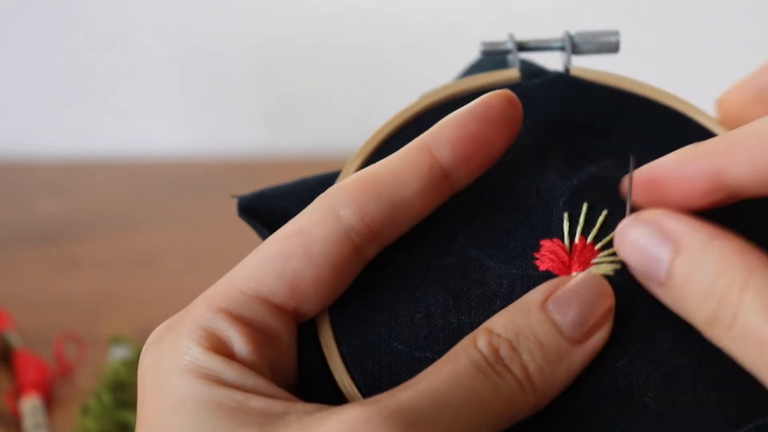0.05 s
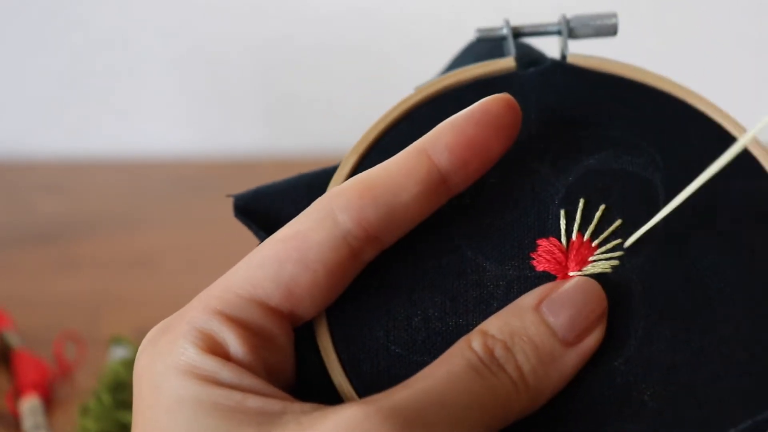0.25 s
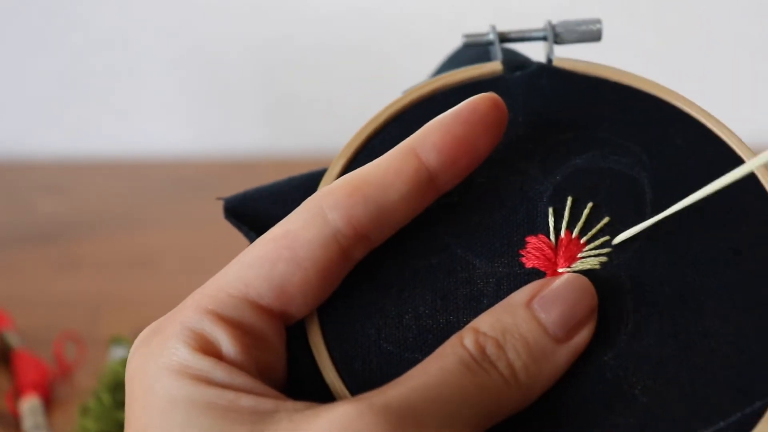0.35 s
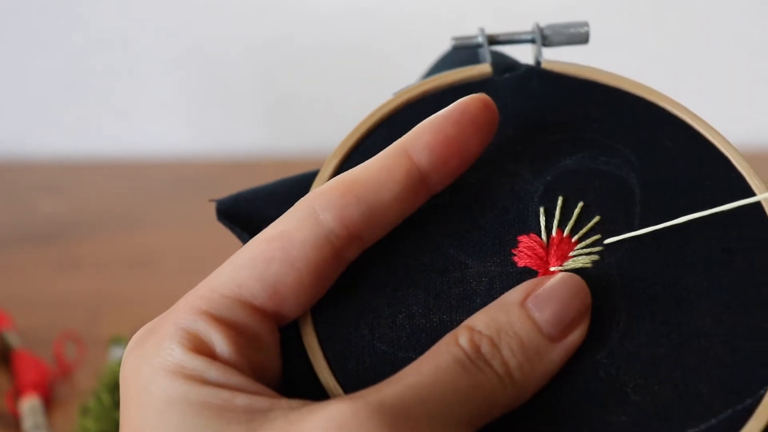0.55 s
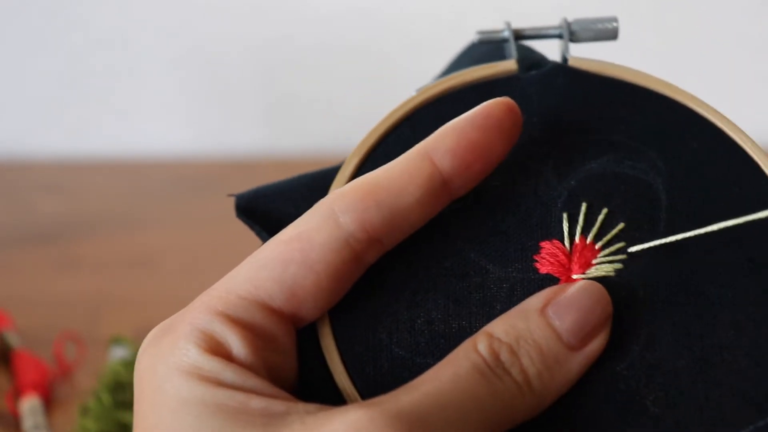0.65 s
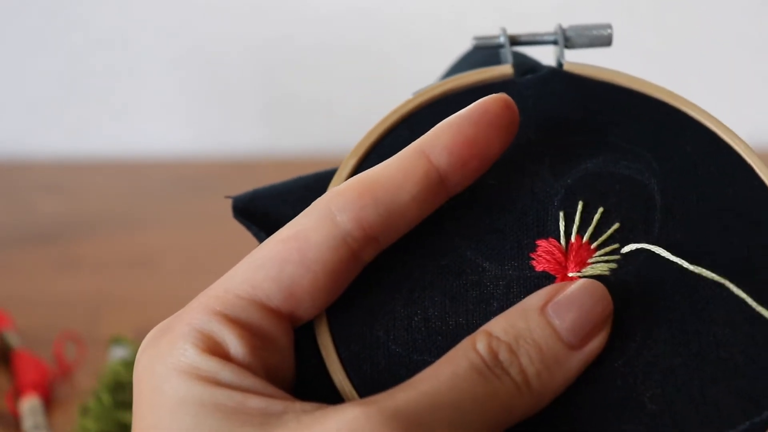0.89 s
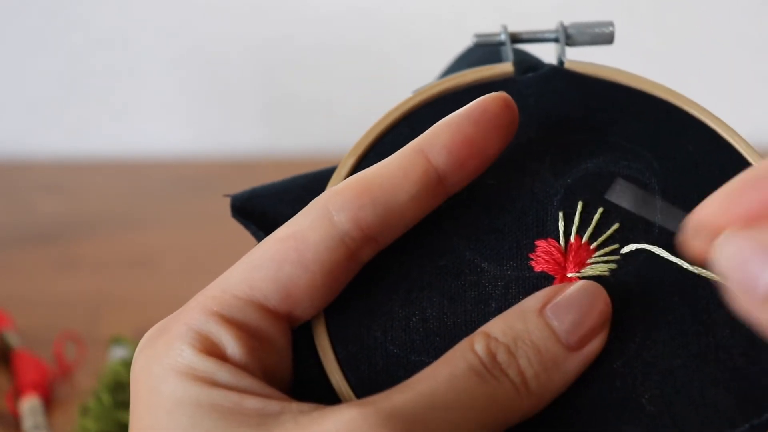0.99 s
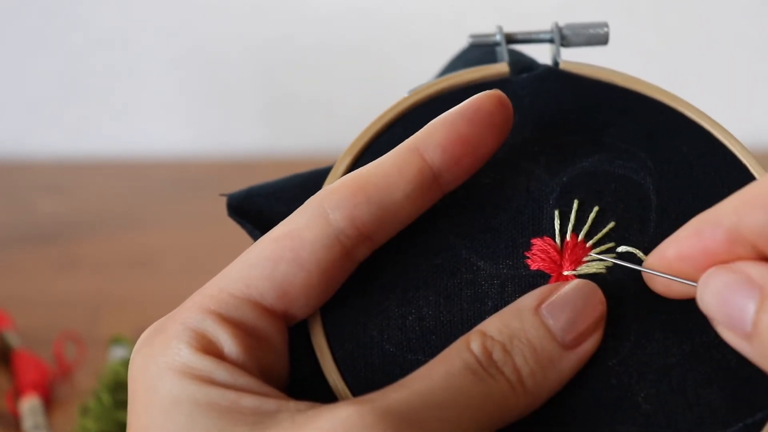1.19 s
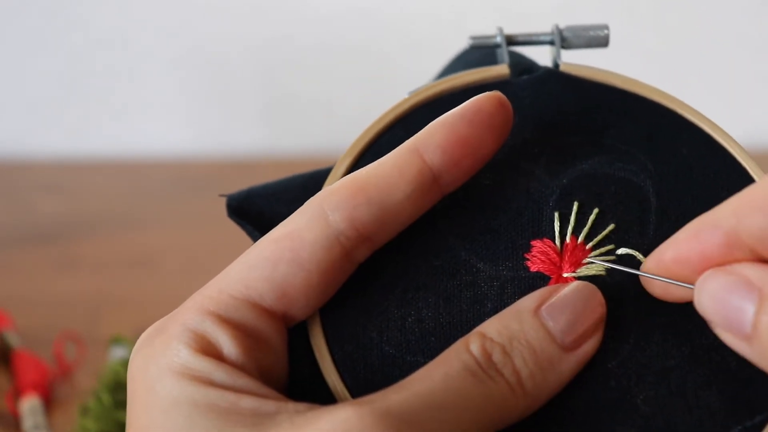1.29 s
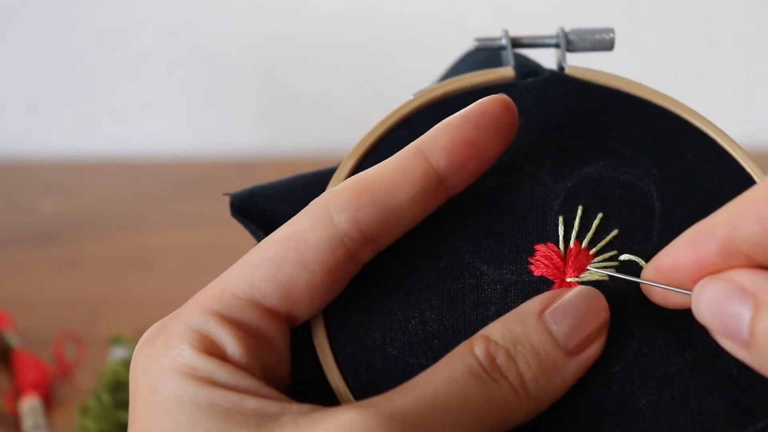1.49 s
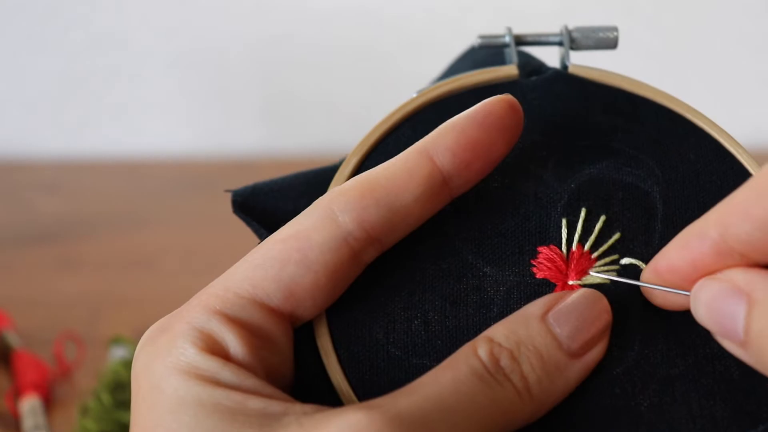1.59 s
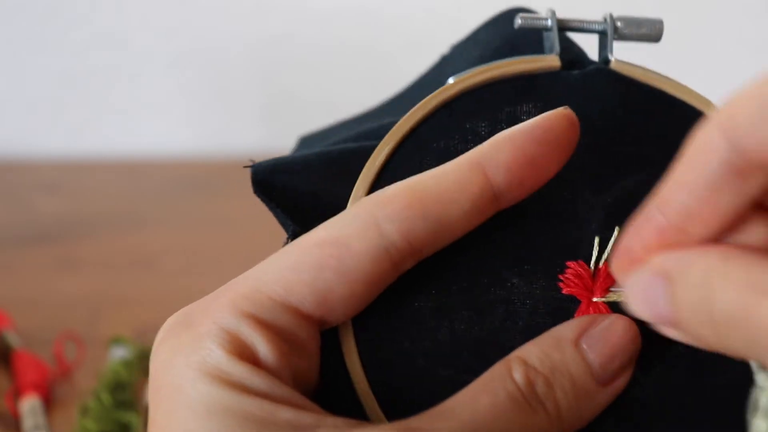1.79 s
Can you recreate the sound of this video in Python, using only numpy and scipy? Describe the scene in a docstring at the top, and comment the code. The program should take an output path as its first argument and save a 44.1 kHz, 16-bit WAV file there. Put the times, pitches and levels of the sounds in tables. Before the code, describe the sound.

One sharp needle pop through drum-tight fabric, followed by the soft rasp of pulled thread.

```python
"""An embroidery needle pops through cloth stretched in a hoop like a small drum: one close stitch.
The shaft squeaks in the weave, the eye clears it with a snap, and the cloth rings in its low modes.
The thread rasps after it and bows faint tones from the cloth until it runs slack.
Later a finger bumps the cloth and the hand rustles back in, over a low room hum and hiss."""
import sys
import numpy as np
from scipy import signal
from scipy.fft import rfft, irfft
from scipy.io import wavfile

SR = 44100
rng = np.random.default_rng(int(sys.argv[2]) if len(sys.argv) > 2 else 0)


def store_pcm(level_fs):
    """Save levels as 16-bit WAV."""
    pcm = np.round(np.clip(level_fs, -1, 1) * 32767).astype(np.int16)
    wavfile.write(sys.argv[1], SR, np.atleast_2d(pcm).T)


N = 81585
T = np.arange(N) / SR
FREQS = np.maximum(np.fft.rfftfreq(N, 1 / SR), 1)


def needle_pop(at_s=.2367, snap_half_width_s=.00032, snap_edge_hz=6100):
    """The eye clears the weave: a snap, a wooden knock, a fibre crack, a steel tick and the cloth's note."""
    cusp = from_db(-9.5) * np.exp(-np.abs(T - at_s) / snap_half_width_s)
    snap = signal.sosfilt(signal.butter(1, snap_edge_hz, fs=SR, output="sos"), cusp + 1e-18)
    knock = from_db(-.5) * signal.lfilter(*signal.iirpeak(2630, Q=1.7, fs=SR), snap)
    crack = noise_burst(at_s, drive_db=-38.5, t60_s=.036, hz=3000, q=.97)
    steel = noise_burst(at_s, drive_db=-37, t60_s=.0012, hz=12000, q=.61)
    drum = from_db(-16) * cloth_ring(at_s)
    return (snap + crack) * panned(-2) + knock * panned(-17.5) + steel * panned(-8) + drum * panned(1)


# Stretched-cloth modes: (frequency [Hz], relative level [dB], T60 [s])
CLOTH_MODES = [(111.4, -6.5, 0.071), (139, -3.5, 0.076), (165, -11, 0.098), (250.4, -11, 0.068),
               (383, -4.5, 0.035), (445, -17.5, 0.11), (610, -60, 0.025), (838, -9.5, 0.014),
               (1020, -16, 0.024)]

def cloth_ring(at_s):
    """The cloth springs back and rings in its damped modes."""
    age_s = np.maximum(T - at_s, 0)
    return -sum(from_db(db - 60 * age_s / t60_s) * np.sin(2 * np.pi * hz * age_s)
                for hz, db, t60_s in CLOTH_MODES)


def hoop_radiation(x, low_cut_hz=85, hollow_hz=1488):
    """The open hoop cancels deep bass and leaves a midrange hollow."""
    x = signal.sosfilt(signal.butter(2, low_cut_hz, "high", fs=SR, output="sos"), x + 1e-18)
    return signal.lfilter(*signal.iirnotch(hollow_hz, Q=1.95, fs=SR), x)


# Thread speed, as rasp level: (time [s], level [dB])
PULL_ENVELOPE = [(.225, -65.5), (.245, -41.5), (.29, -43.5), (.345, -42.5), (.39, -46.5), (.44, -46),
                 (.468, -52.5), (.49, -56.5), (.53, -52.5), (.575, -61), (.66, -83)]
# Rasp colour: (frequency [Hz], relative density [dB])
RASP_SPECTRUM = [(35, -39), (70, -4), (140, 8), (200, -3), (260, 0), (350, -5), (560, 1), (720, -3),
                 (1150, -3.5), (1430, -15.5), (2300, -11), (3000, -11.5), (4200, -18.5), (6500, -20.5),
                 (7500, -22), (10000, -24), (11500, -30.5), (13500, -27), (15500, -39)]
# Thread-driven resonances: (frequency [Hz], width [Hz], boost [dB])
RASP_RESONANCES = [(493, 91, 2.5), (1060, 150, 0.5), (5100, 780, 5.5)]
# Rasp width, also for squeaks: (frequency [Hz], L/R correlation [-])
RASP_CORRELATION = [(60, 0.78), (150, 0.99), (640, 0.96), (1400, 0.77), (3100, 0.66), (6800, -0.13),
                    (15000, -0.43)]
# Balance of rasp, rub and rustle: (frequency [Hz], L-R [dB])
FRICTION_PAN = [(60, -5.5), (300, -0.5), (1200, -1.5), (2400, -4.5), (4000, -2.5), (5200, -5), (8000, -0.5),
                (15000, -11)]

def thread_rasp(slips_per_s=3500, spread_db=2):
    """Tiny fibre slips shake the cloth while the thread runs."""
    sizes = from_db(spread_db * np.minimum(rng.exponential(1, (2, N)), 4))
    slips = np.sign(white_pair()) * sizes * (rng.random((2, N)) < slips_per_s / SR)
    boost_db = sum(db / (1 + (2 * (FREQS - hz) / width_hz) ** 2) for hz, width_hz, db in RASP_RESONANCES)
    rasp = shaped_stereo(slips, over_hz(RASP_SPECTRUM) + boost_db, RASP_CORRELATION, FRICTION_PAN)
    return rasp * envelope(PULL_ENVELOPE)


# Bowed cloth tones: (frequency [Hz], level [dB])
CLOTH_TONES = [(492, -53.5), (1060, -73)]

def cloth_singing(start_s=.202, end_s=.578, ramp_s=.027, fade_db_per_s=13):
    """The thread bows the cloth into faint, unsteady tones that die away with the rasp."""
    attack = np.clip((T - start_s) / ramp_s, 0, 1)
    release = np.exp(-np.maximum(T - end_s, 0) / ramp_s)
    fade_db = fade_db_per_s * (T - start_s)
    out = 0
    for hz, db in CLOTH_TONES:
        phase = wavering_phase(hz, depth=.03, rate_hz=81)
        flutter_db = 2 * drift(25)
        out += from_db(db - fade_db + flutter_db) * np.sin(phase)
    return attack * release * out


# Shaft sticking in the weave: (time [s], level [dB], pitch [Hz])
NEEDLE_SQUEAKS = [(0.026, -53, 1017), (.046, -49, 1140), (0.117, -51, 952)]

def needle_squeaks(rise_s=.0016, t60_s=.066, octave_db=-5.5, rub_db=-5.5):
    """Stick-slip gives short wavering tones with an octave and rubbing noise."""
    rub = shaped_stereo(white_pair(), over_hz(RUSTLE_SPECTRUM), RASP_CORRELATION, FRICTION_PAN)
    out = 0
    for at_s, db, hz in NEEDLE_SQUEAKS:
        age_s = np.maximum(T - at_s, 0)
        gain = np.minimum(age_s / rise_s, 1) * from_db(db - 60 * age_s / t60_s)
        phase = wavering_phase(hz, depth=.038, rate_hz=202)
        tone = np.sin(phase) + from_db(octave_db) * np.sin(2 * phase)
        out += gain * (tone + from_db(rub_db) * rub)
    return out


# Bumps on the cloth: (time [s], gain [dB], contact time [s])
CLOTH_BUMPS = [(.222, -51, 0.00065), (0.253, -34, 0.00037), (.456, -42, .002), (1.057, -41, 0.0011)]

def cloth_bumps():
    """Soft contacts favour the cloth's low modes."""
    out = 0
    for at_s, db, contact_s in CLOTH_BUMPS:
        pole = np.exp(-2 / (contact_s * SR))
        out += from_db(db) * signal.lfilter([1 - pole], [1, -pole], cloth_ring(at_s) + 1e-18)
    return out * panned(1)


# Pulls on the hoop: (time [s], envelope peak [dB])
HOOP_TUGS = [(.382, -43), (1.395, -61.5)]

def hoop_tugs(hz=69.6, half_width_s=.013):
    """Each pull rocks the whole hoop in a brief deep swing, off to the right."""
    swings = sum(from_db(db) * np.exp(-((T - at_s) / half_width_s) ** 2) * np.sin(2 * np.pi * hz * (T - at_s))
                 for at_s, db in HOOP_TUGS)
    return swings * panned(-13)


# Needle and nail contacts: (time [s], level [dB], frequency [Hz])
LIGHT_TICKS = [(0.273, -46.5, 1900), (1.059, -56.5, 3100)]

def light_ticks(t60_s=.041, q=5):
    """Needle and fingernail make tiny pitched scratches."""
    out = 0
    for at_s, db, hz in LIGHT_TICKS:
        bandwidth_makeup = np.sqrt(SR * q / (np.pi * hz))
        out += bandwidth_makeup * noise_burst(at_s, db, t60_s, hz, q)
    return out


# Hand movement: (time [s], level [dB])
RUSTLE_ENVELOPE = [(0, -68), (.05, -67), (.085, -60), (.115, -59), (.15, -68.5), (.19, -59.5), (.24, -59.5),
                   (.7, -65), (1.0, -65.5), (1.07, -62.5), (1.15, -64.5), (1.58, -66.5), (1.72, -63),
                   (1.83, -57)]
# Rustle colour, also for squeaks: (frequency [Hz], relative density [dB])
RUSTLE_SPECTRUM = [(100, -33), (400, 6.5), (1000, -4.5), (1500, -1), (2800, 2), (4200, -4.5), (5200, -3),
                   (8000, -6), (15500, -21)]

def hand_rustle():
    """Skin and needle brush over the cloth."""
    rustle = shaped_stereo(white_pair(), over_hz(RUSTLE_SPECTRUM), ROOM_CORRELATION, FRICTION_PAN)
    return rustle * envelope(RUSTLE_ENVELOPE)


# Room hum: (frequency [Hz], level [dB])
HUM_TONES = [(50, -75), (100, -66.5), (141, -63.5), (233, -72), (290, -67.5), (362, -70.5), (795, -75)]
# Room noise colour: (frequency [Hz], relative density [dB])
ROOM_SPECTRUM = [(15, -37), (25, -12), (38, -15), (71, -7.5), (91, -10), (140, -3), (169, -8), (233, -7.5),
                 (260, -7), (289, -8.5), (389, -11.5), (421, -10), (614, -16.5), (804, -15.5), (919, -16),
                 (3000, -21), (15500, -36.5)]
# Room width, also for rustle: (frequency [Hz], L/R correlation [-])
ROOM_CORRELATION = [(60, 0.67), (150, 0.82), (380, 0.62), (950, 0.15), (2380, -0.02), (5980, 0.005),
                    (15000, -0.036)]
# Room balance: (frequency [Hz], L-R [dB])
ROOM_BALANCE = [(50, 4), (300, 1), (2000, 3.5), (15000, 3.5)]

def room_tone(noise_db=-57, waver_db=2, waver_hz=1.8):
    """Steady rumble and hiss with a wavering hum."""
    hum = 0
    for hz, db in HUM_TONES:
        gain = from_db(db + waver_db * drift(waver_hz))
        hum += gain * np.sin(2 * np.pi * hz * T + drift(waver_hz))
    noise = shaped_stereo(white_pair(), over_hz(ROOM_SPECTRUM), ROOM_CORRELATION, ROOM_BALANCE)
    return hum + from_db(noise_db) * noise


def noise_burst(at_s, drive_db, t60_s, hz, q):
    """Decaying noise through one resonance."""
    burst = white_pair() * (T > at_s) * from_db(drive_db - 60 * np.abs(T - at_s) / t60_s)
    return signal.lfilter(*signal.iirpeak(hz, q, fs=SR), burst + 1e-18)


def shaped_stereo(pair, spectrum_db, correlation_table, pan_table):
    """Two independent signals to unit-rms stereo of given colour, width and balance."""
    mid, side = rfft(pair)
    correlation = np.clip(over_hz(correlation_table), -.99, .99)
    stereo = np.sqrt(1 + correlation) * mid + np.sqrt(1 - correlation) * side * [[1], [-1]]
    return unit_rms(irfft(stereo * from_db(spectrum_db) * panned(over_hz(pan_table)), N))


def wavering_phase(hz, depth, rate_hz):
    """Phase [rad] of a tone whose pitch wanders by the rms fraction depth."""
    return 2 * np.pi * np.cumsum(hz * (1 + depth * drift(rate_hz))) / SR


def drift(corner_hz):
    """Low-passed noise, unit rms."""
    return unit_rms(irfft(rfft(rng.standard_normal(N)) / (1 + (FREQS / corner_hz) ** 2), N))


def white_pair():
    """Two independent white noises."""
    return rng.standard_normal((2, N))


def envelope(points):
    """Gain curve from (time [s], level [dB]) points."""
    return from_db(np.interp(T, *np.transpose(points)))


def over_hz(points):
    """Table interpolated on a log-frequency axis."""
    hz, value = np.transpose(points)
    return np.interp(np.log(FREQS), np.log(hz), value)


def panned(db):
    """Channel gains for L-R [dB]."""
    return from_db(np.array([[.5], [-.5]]) * db)


def unit_rms(x):
    """Scale to rms 1."""
    return x / np.sqrt(np.mean(x ** 2) + 1e-20)


def from_db(db):
    """Decibels to gain."""
    return 10 ** (np.asarray(db) / 20)


def scene():
    """One stitch in a quiet room."""
    needle_and_bumps = needle_squeaks() + hoop_radiation(needle_pop() + cloth_bumps())
    pull = thread_rasp() + cloth_singing() + hoop_tugs()
    return needle_and_bumps + pull + light_ticks() + hand_rustle() + room_tone()


def record(dry):
    """Steep low-pass on the top treble."""
    cutoff_hz = 15850
    return signal.sosfilt(signal.ellip(10, .1, 70, cutoff_hz, fs=SR, output="sos"), dry)


dry = scene()
out = record(dry)
store_pcm(out)
```